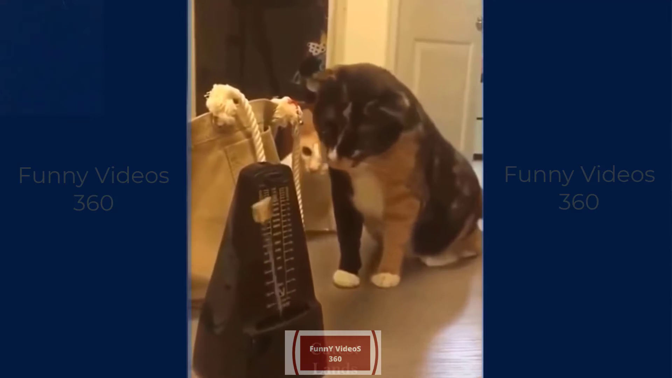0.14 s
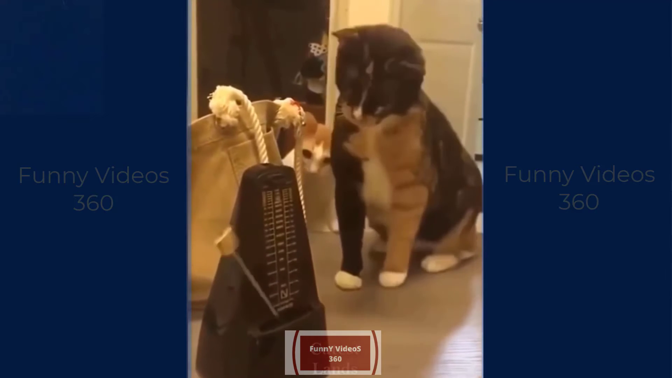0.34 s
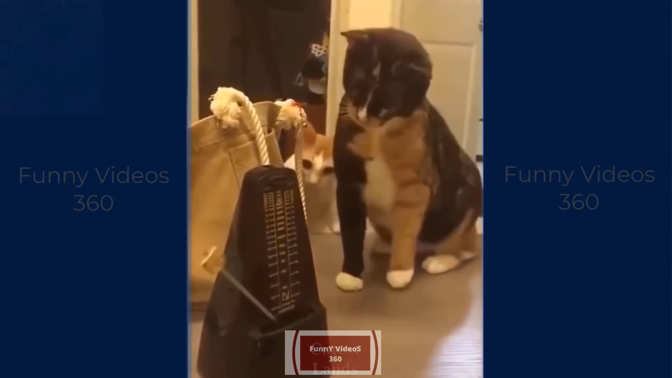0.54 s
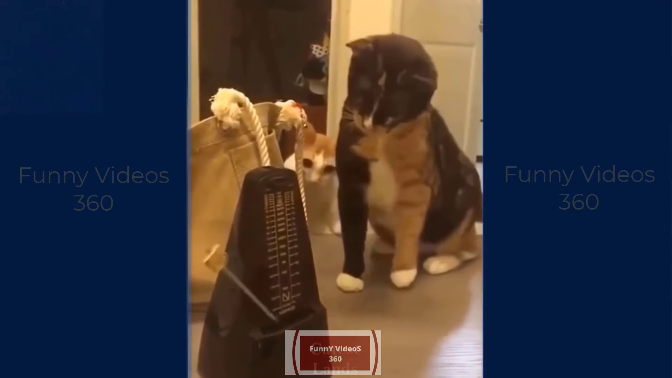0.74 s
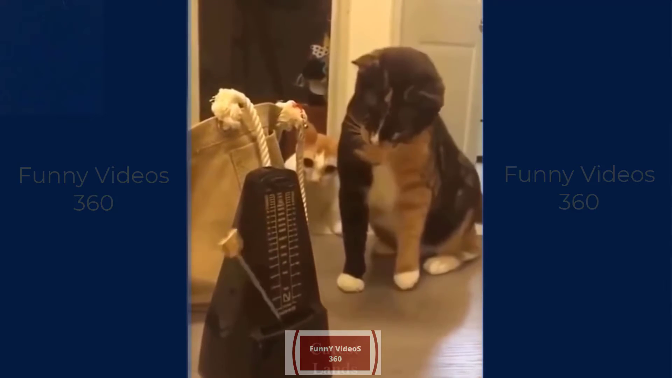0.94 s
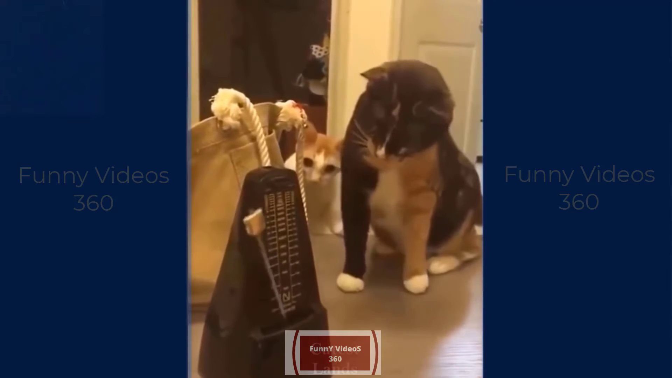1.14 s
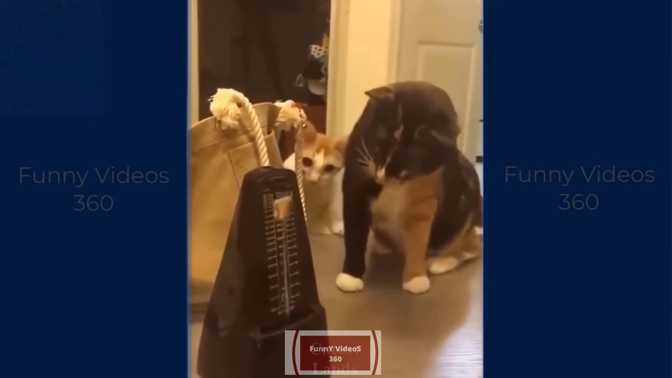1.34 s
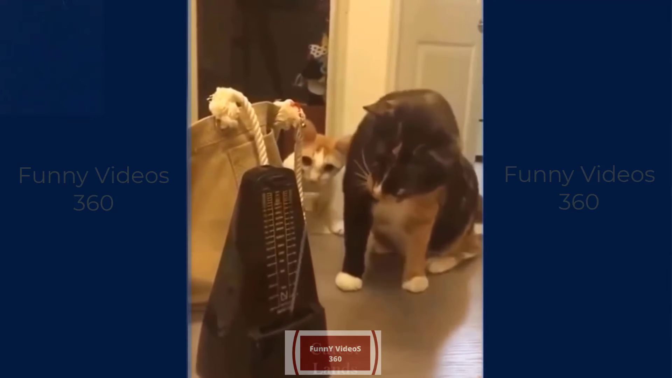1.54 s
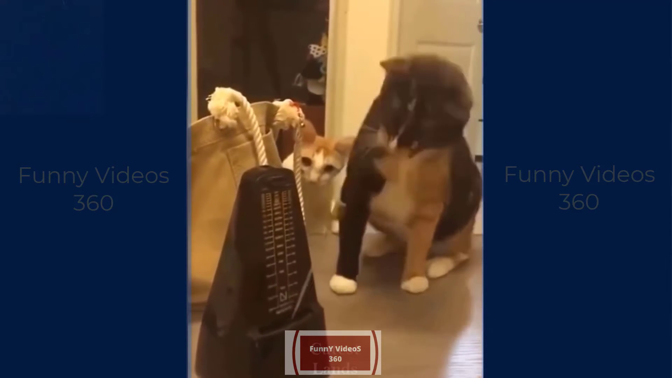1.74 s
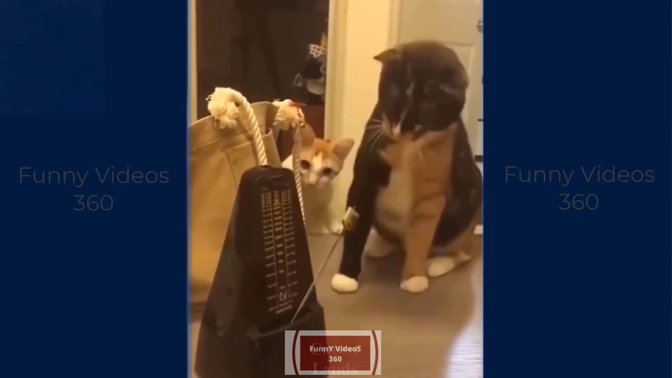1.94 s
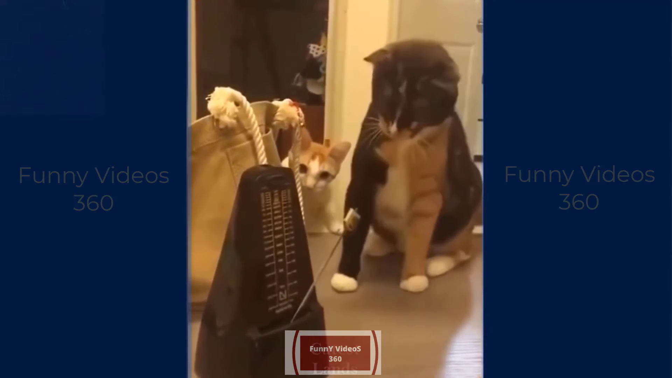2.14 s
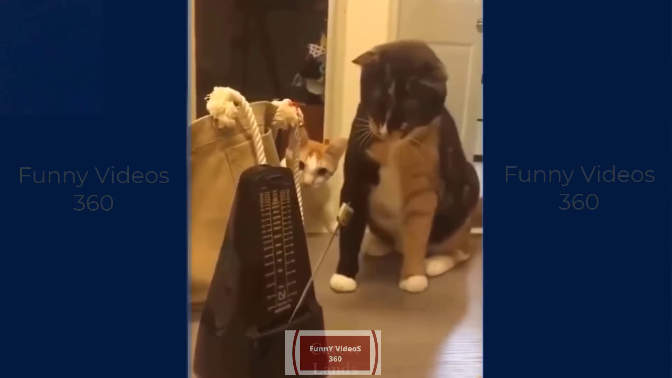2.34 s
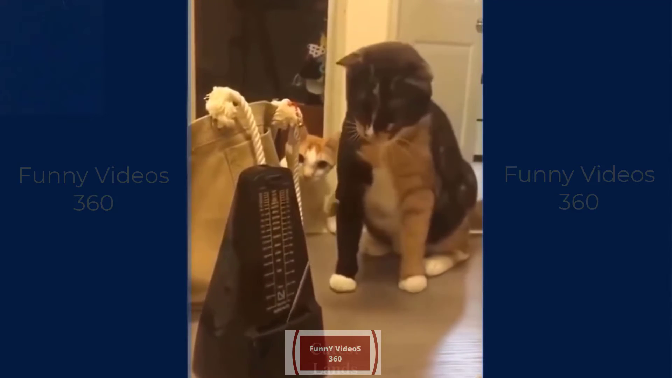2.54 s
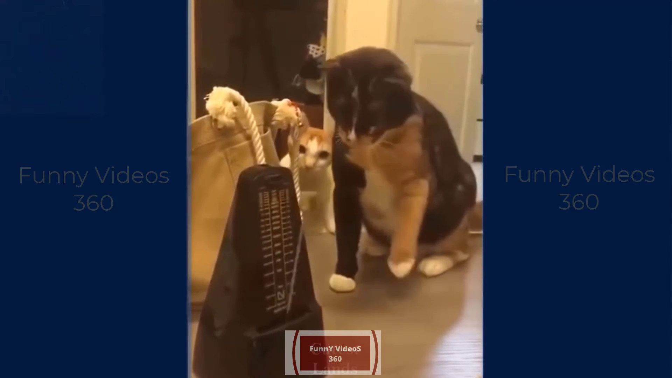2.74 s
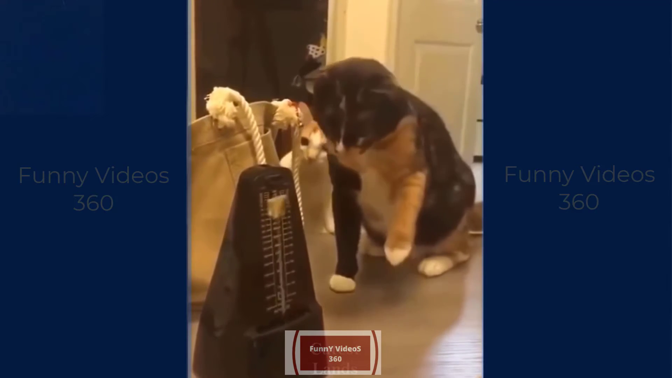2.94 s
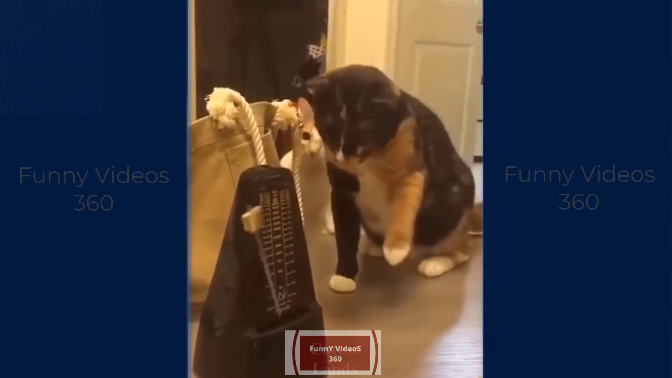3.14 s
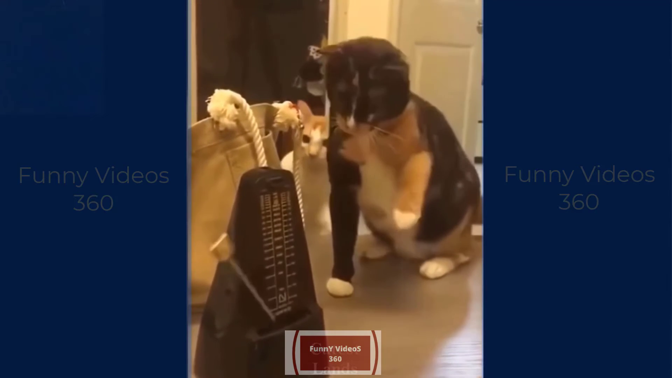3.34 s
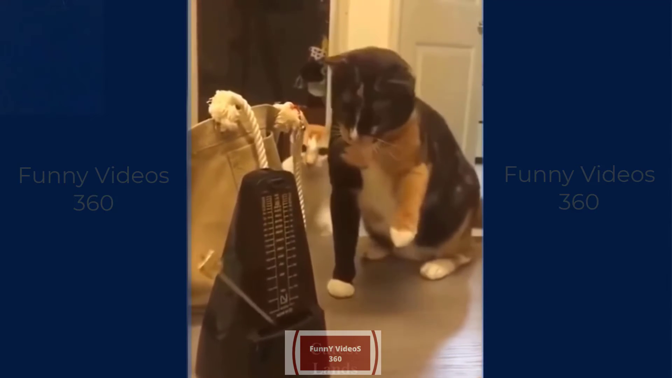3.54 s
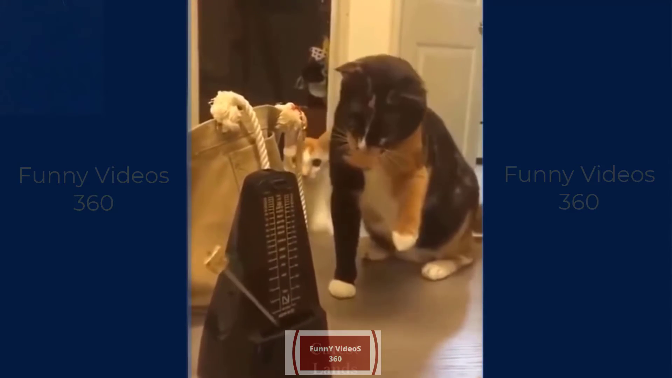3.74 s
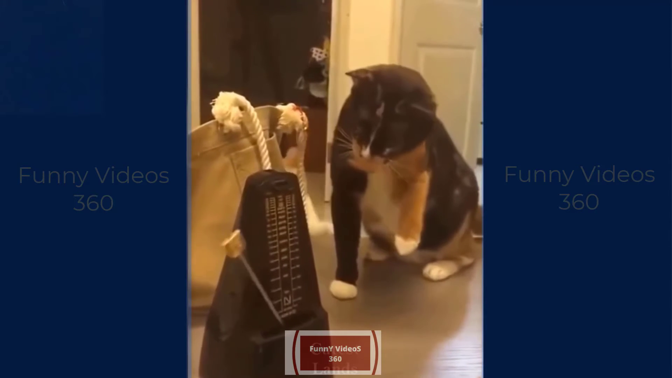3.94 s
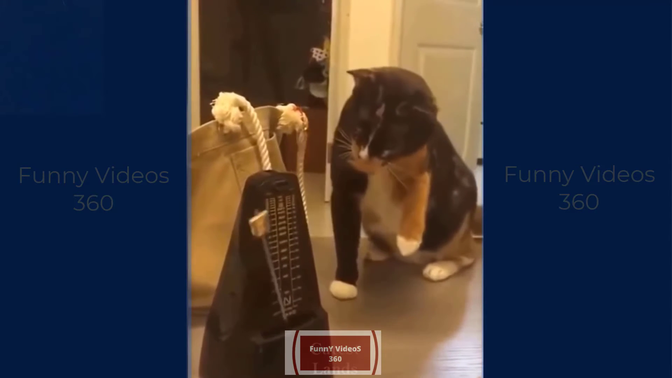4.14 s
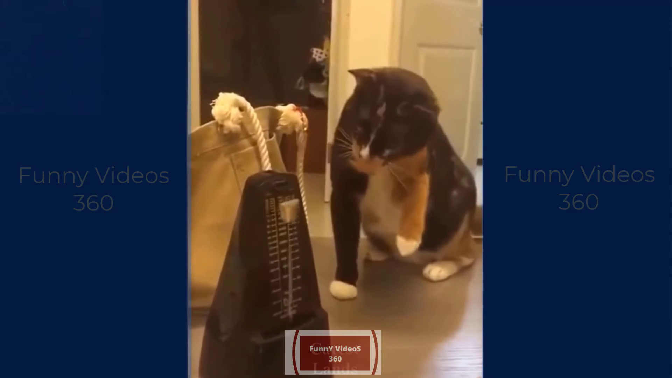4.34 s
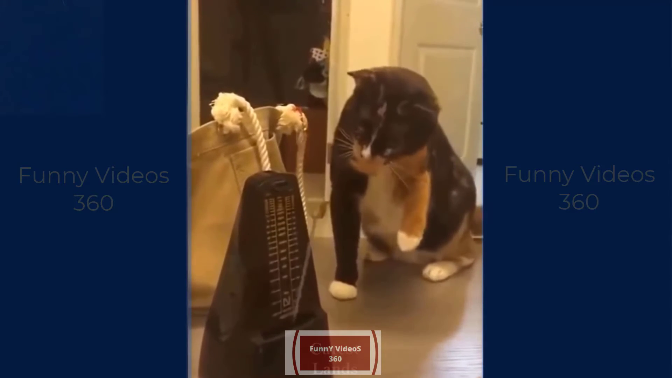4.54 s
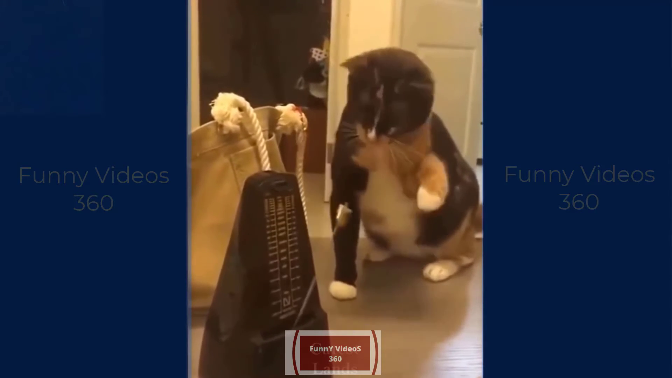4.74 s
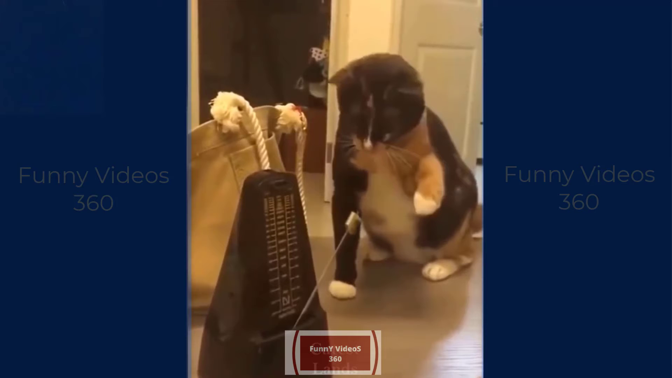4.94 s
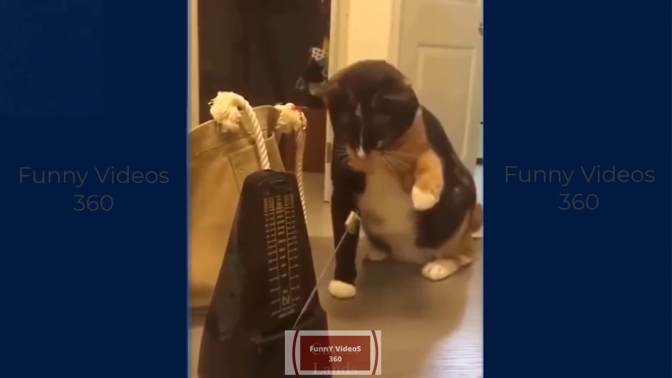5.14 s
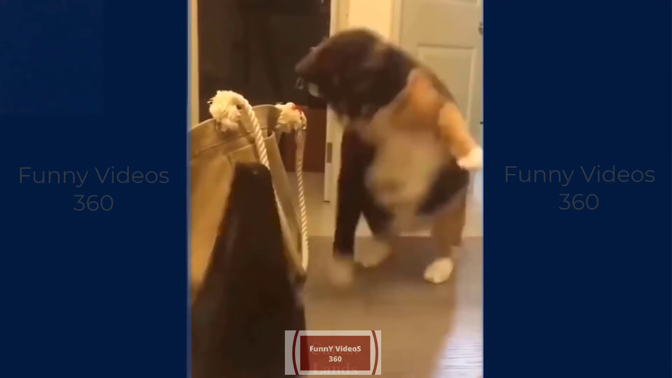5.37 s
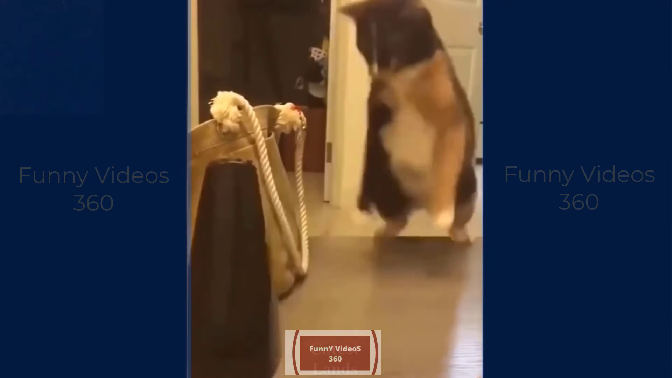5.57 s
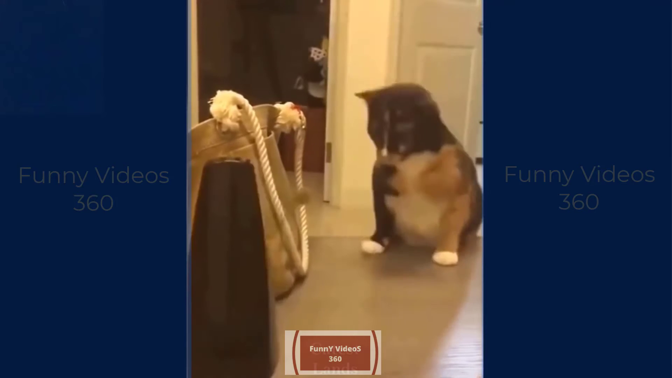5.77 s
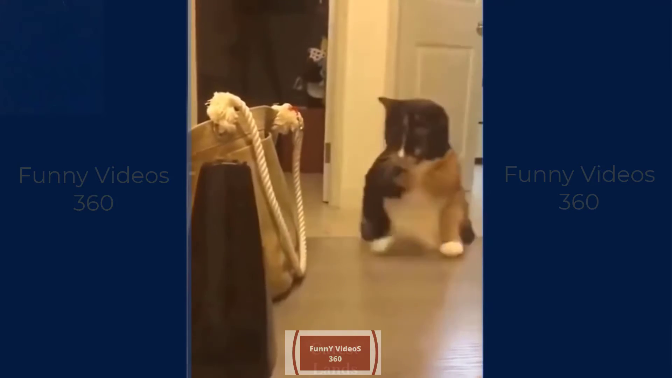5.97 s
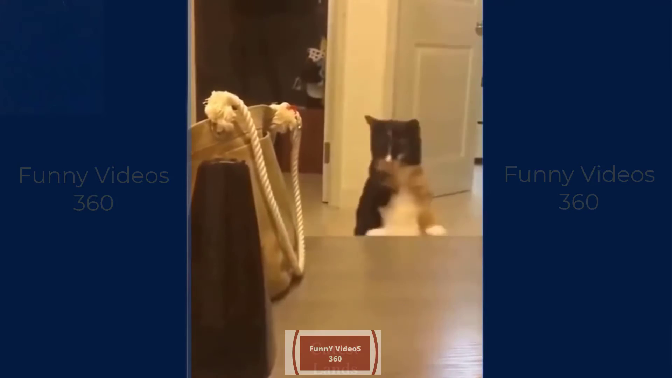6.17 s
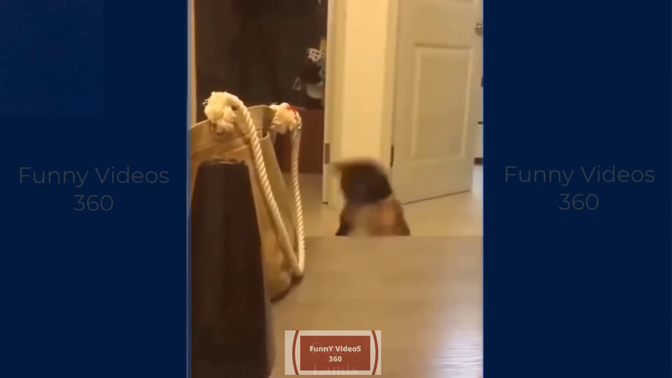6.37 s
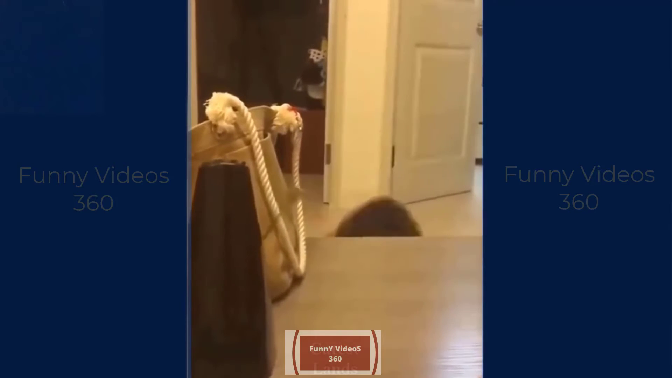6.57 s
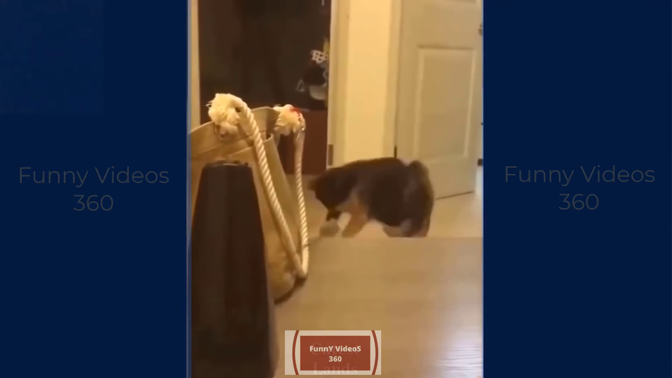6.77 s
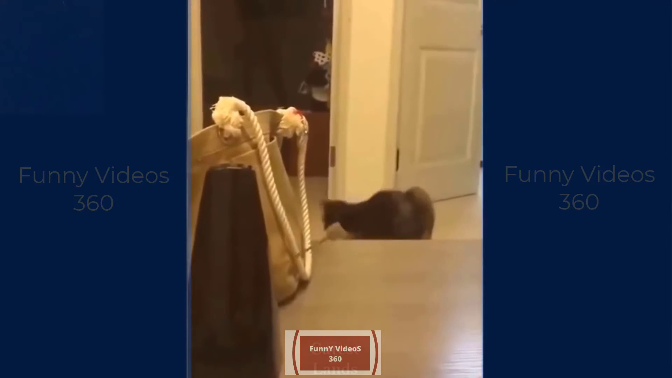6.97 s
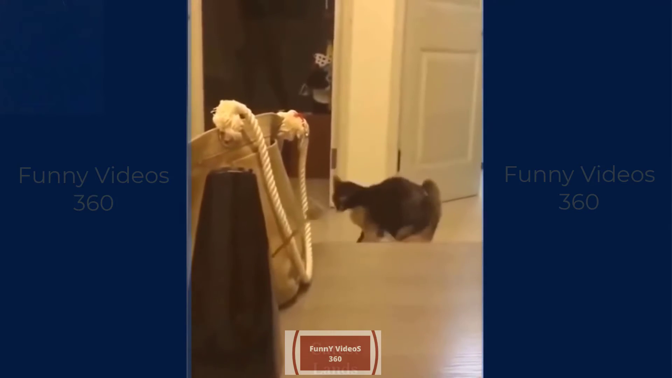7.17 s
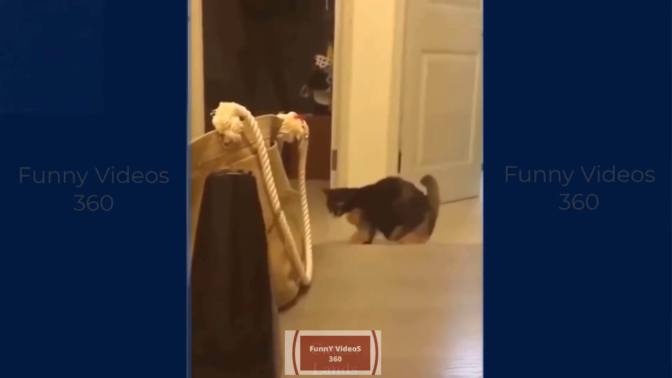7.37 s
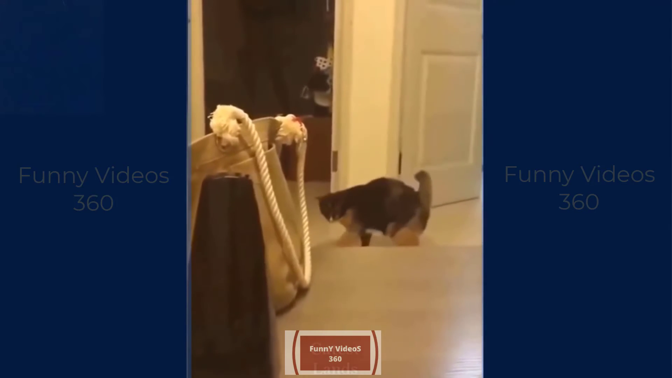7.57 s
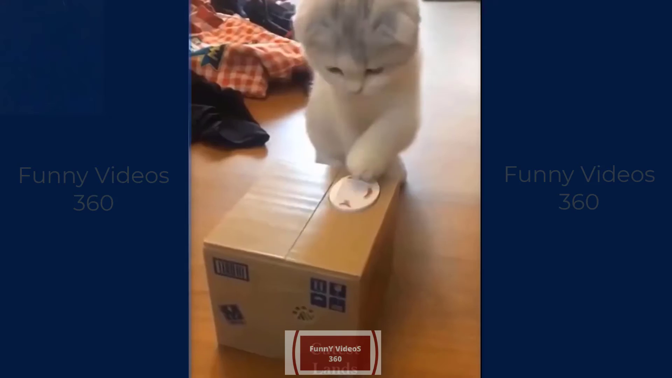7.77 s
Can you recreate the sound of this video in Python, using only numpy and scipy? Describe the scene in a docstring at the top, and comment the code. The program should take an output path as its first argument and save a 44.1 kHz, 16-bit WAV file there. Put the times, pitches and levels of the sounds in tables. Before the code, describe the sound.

Sparse, woody metronome clicks in a small room, interrupted by a burst of claw clacks, hollow knocks and sliding, then ticking resumes, duller.

```python
"""A wind-up metronome ticks slowly on a table in a small room, over the hum of the house.
A cat swats it: claws rake the case, it rocks round on the table top with hollow thumps, paws scuffle away,
and it ticks on with its back to the microphone. Clicks ring the modes of case, rod and table top;
shaped noise makes the sliding and the hum; early echoes and a diffuse tail make the room."""
import sys
import numpy as np
from scipy import signal
from scipy.fft import rfft, irfft
from scipy.io import wavfile

SR = 44100
rng = np.random.default_rng(int(sys.argv[2]) if len(sys.argv) > 2 else 0)


def put_to_file(sound):
    """Save the sound as 16-bit audio at rate SR, in the file named by the first command-line argument."""
    columns = np.atleast_2d(sound).T  # one column per channel
    safe = np.clip(columns, -1, 1)
    whole_steps = np.round(safe * 32767)
    wavfile.write(sys.argv[1], SR, whole_steps.astype(np.int16))


def attenuation_scalar(level_db):
    """Turn a level in dB into a linear amplitude multiplier (20 dB per decade)."""
    decades = np.asarray(level_db, float) / 20
    return 10 ** decades


N = 344416   # length in samples


def in_hz(points, hz):
    """Read a table on a log-frequency axis."""
    p = np.array(points)
    return np.interp(np.log(hz), np.log(p[:, 0]), p[:, 1])


def rms_one(x):
    """Scale to rms 1."""
    return x / np.sqrt(np.mean(x ** 2) + 1e-20)


def coloured(white, spectrum):
    """Give noise a spectrum; rms 1."""
    hz = np.fft.rfftfreq(N, 1 / SR) + 1
    shaped = rfft(white) * attenuation_scalar(in_hz(spectrum, hz))
    return rms_one(irfft(shaped, N))


def drift(rate_hz):
    """Slow chance: straight lines between random knots of spread 1, rate_hz knots a second (40 at most)."""
    knots = rng.standard_normal(int(N / SR * 40) + 2)
    return np.interp(np.arange(N) / SR * rate_hz, np.arange(len(knots)), knots)


def ring(force, hz, t60_s):
    """A damped resonator: a unit click sets a sine of height 1 ringing."""
    radius = attenuation_scalar(-60 / (t60_s * SR))
    turn = 2 * np.pi * hz / SR   # radians per sample
    return signal.lfilter([0, np.sin(turn)], [1, -2 * radius * np.cos(turn), radius ** 2], force + 1e-18)


def hum():
    """Low house noise with narrow booms where the room resonates, and a faint air hiss; noise and hiss waver."""
    # spectrum of the house noise: hz, density_db (per Hz, relative)
    hum_colour = [(12, -66.5), (20, -51), (75, -6), (109, -7.5), (139, -1.5), (160, -19), (194, 6),
                  (215, -5), (339, -8), (383, -18.5), (524, -13.5), (1300, -34), (1690, -70.5),
                  (2860, -120)]
    # spectrum of the air hiss: hz, density_db (per Hz, relative)
    air_colour = [(760, -32), (1300, -5.5), (2000, -0.5), (3140, -8), (3660, -12), (4110, -10.5),
                  (4910, -18), (5660, -17), (8920, -22), (9700, -19), (12600, -56.5), (21300, -120)]
    # room resonances that the hum excites: hz, width_hz, level_db (rms)
    booms = [(76.3, 16.3, -35.5), (189.9, 8, -38), (252.9, 11, -42), (302, 86, -43.5)]
    hum_db, air_db = -32, -54
    out = attenuation_scalar(hum_db + 2.4 * drift(3.155)) * coloured(rng.standard_normal(N), hum_colour)
    waver_db = 0.72 * drift(2.556) + 0.95 * drift(14)
    out += attenuation_scalar(air_db + waver_db) * coloured(rng.standard_normal(N), air_colour)
    for hz, width_hz, level_db in booms:
        boom = ring(rng.standard_normal(N), hz, 3.46 / width_hz)
        out += attenuation_scalar(level_db) * rms_one(boom)
    return out


def blows():
    """Ticks and knocks on the case as rows: start_s, level_db, treble_db, scrape_db, body_db, turned (0-1)."""
    # the escapement ticks: start_s, level_db (relative), treble_db (on the high modes)
    tick_rows = [(0.5036, 1, 0.5), (2.004, 0, 4), (3.4182, 1, 2.5), (4.899, 1, 1.5), (6.331, 2.5, -6.5),
                 (6.799, 2, 5)]
    # claws and table edge knock the case: start_s, level_db (relative), treble_db (on the high modes),
    # turned (share of the back that faces the microphone, 0-1)
    knock_rows = [(0.7587, -35, 7.5, 0.9), (5.568, -3, -2, 0.9), (5.5757, -1.5, 8, 0.4),
                  (5.604, -12, 10, 0.4), (5.6338, -1.5, 3, 0.5), (5.687, -6, 3.5, 0.4),
                  (5.7232, -11, 1, 0.8), (5.754, -14, 6.5, 0.9), (5.7885, -14.5, 1, 0.9),
                  (5.8641, -5, 3.5, 0.9), (5.8755, -6.5, -6, 1), (5.9627, -13, -0.5, 0.4),
                  (5.9968, -11, -12.5, 0.5), (6.0066, -4.5, 2.5, 0.7), (7.1858, -25, -4, 0.8)]
    swatted_s, turned_before, turned_after = 5.57, 0.26, 0.98
    tick_scrape_db, tick_body_db = -26.5, -4.5
    knock_scrape_db, knock_body_db = -25, -5.5
    rows = []
    for start_s, level_db, treble_db in tick_rows:
        turned = turned_after if start_s > swatted_s else turned_before
        rows.append((start_s, level_db, treble_db, tick_scrape_db, tick_body_db, turned))
    for start_s, level_db, treble_db, turned in knock_rows:
        rows.append((start_s, level_db, treble_db, knock_scrape_db, knock_body_db, turned))
    return rows


def case(level_db=-10, spread_db=2.2, crack_db=8, scrape_ms=2.07, soft_hz=4000, lag_cycles=1.2):
    """Each blow, a rounded click with a short scrape behind it, drives all modes. Returns modes and bare cracks."""
    # modes of the case: hz, front_db (heard from the front), back_db (from behind), t60_s
    case_modes = [(324.4, -14, -17, 0.099), (536, -17, -7.5, 0.02), (657, 2, -28.5, 0.04),
                  (813, -9, -1, 0.029), (916, -16.5, -7.5, 0.0092), (1046, -6, -4, 0.019),
                  (1276, -16.5, -16, 0.012), (1793, -15, -10, 0.021), (2027, -6, -13.5, 0.028),
                  (2260, -8.5, -5, 0.0062), (2528, -0.5, -20, 0.023), (2712, 0.5, -5.5, 0.011),
                  (2748, 3.5, -6, 0.014), (3244, -7.5, -9, 0.021), (3470, -3, -32.5, 0.022),
                  (3740, -12.5, -10, 0.0056), (3784, -19.5, -10, .012), (4014, -15.5, -12.5, 0.026),
                  (4630, -2.5, -15, 0.0065), (4720, -5, -13, 0.016), (5116, -6.5, -9.5, 0.0016),
                  (5300, -5.5, -3, 0.0025), (5814, -9.5, -7.5, 0.005), (6130, -13, -3, 0.0034),
                  (6850, -5, -4.5, 0.002), (7580, -13.5, -5.5, 0.0053), (8080, -3.5, -11, 0.0062),
                  (9140, -5.5, -27, 0.0013)]
    body_hz, treble_hz = 1500, 4950   # body modes lie below, treble modes above
    rows = blows()
    age = np.arange(SR // 4) / SR
    modes, cracks = np.zeros((2, N + SR))
    chance = rng.standard_normal((len(rows), len(case_modes)))
    grit = rng.standard_normal((len(rows), len(age)))
    click = signal.lfilter(*signal.butter(2, soft_hz, fs=SR), age == 0) * SR / (4 * soft_hz)
    fade = 1000 * age / scrape_ms
    grit = np.diff(grit, prepend=0) * fade * np.exp(1 - fade)   # differencing makes the scrape bright
    crack_band = signal.butter(1, [900, 6500], "band", fs=SR)   # the contact itself, heard between the modes
    for (start_s, blow_db, treble_db, scrape_db, body_db, turned), luck, rough in zip(rows, chance, grit):
        force = attenuation_scalar(blow_db + level_db) * (click + attenuation_scalar(scrape_db) * rough)
        turned = np.clip(turned, 0, 1)
        cracks[round(start_s * SR):][:len(age)] += attenuation_scalar(crack_db) * signal.lfilter(*crack_band, force)
        for k, (hz, front_db, back_db, t60_s) in enumerate(case_modes):
            heard_db = front_db + turned * (back_db - front_db) + spread_db * luck[k]
            heard_db += treble_db * (hz > treble_hz) + body_db * (hz < body_hz)
            at = round((start_s + lag_cycles / hz) * SR)   # low modes take longer to speak
            modes[at:at + len(age)] += (-1) ** k * attenuation_scalar(heard_db) * ring(force, hz, t60_s)
    no_bass = signal.butter(2, 250, "high", fs=SR, output="sos")   # a small box sends out no bass
    return signal.sosfilt(no_bass, np.stack([modes, cracks])[:, :N])


def rod(level_db=-9, spread_db=1.5):
    """Claws catch the thin metal pendulum rod, which rings a little longer than the case."""
    # claws catch the rod: start_s, level_db (relative)
    swats = [(5.5722, 0), (5.5751, 1.5), (5.5834, 0), (5.6024, -16), (5.8745, -15.5)]
    # modes of the rod: hz, level_db (relative), t60_s
    rod_modes = [(2150, -8, .06), (3320, -1, .11), (3440, -6, .09), (4070, -8, .05), (4740, -11, .06)]
    start_s, swat_db = np.transpose(swats)
    out = np.zeros(N)
    chance = rng.standard_normal((len(swats), len(rod_modes)))
    for (hz, mode_db, t60_s), luck in zip(rod_modes, chance.T):
        force = np.zeros(N)
        force[np.round(start_s * SR).astype(int)] = attenuation_scalar(swat_db + level_db + mode_db + spread_db * luck)
        out += ring(force, hz, t60_s)
    return out


def scuffle(per_s=1800, grain_db=2.5, judder_db=2.0):
    """Sliding contact: dense uneven grains under a juddering slide and short strokes of the paws."""
    # the base slides over the table top: time_s, level_db (before judder)
    slide = [(5.575, -65.5), (5.588, -14.5), (5.628, -24), (5.65, -13.5), (5.705, -14.5), (5.79, -22.5),
             (5.86, -29.5), (5.93, -32.5), (5.99, -20), (6.07, -32.5), (6.17, -36.5), (6.2, -60)]
    # paws scuff away: start_s, level_db (relative)
    scuffs = [(6.197, -24.5), (6.232, -24.5), (6.282, -26)]
    # colour of sliding contact: hz, density_db (per Hz, relative)
    scuffle_colour = [(88, -30), (150, -13.5), (323, 4), (405, -7), (844, -10.5), (1120, -24), (1280, -15),
                      (1500, -27), (2020, -13.5), (7870, -43), (9700, -56.5), (12600, -76), (21300, -120)]
    t = np.arange(N) / SR
    slide_db = np.interp(t, *np.transpose(slide), left=-200, right=-200)
    stroke = attenuation_scalar(slide_db + judder_db * drift(30))
    for start_s, level_db in scuffs:
        fade = np.maximum(t - start_s, 0) / 0.032   # decay time in s
        stroke = stroke + attenuation_scalar(level_db) * (1 - np.exp(-8 * fade)) * np.exp(-fade)
    struck = rng.random(N) < per_s / SR
    height = attenuation_scalar(grain_db * np.minimum(rng.exponential(1, N), 4))
    grains = struck * height * rng.choice([-1, 1], N)
    return stroke * coloured(grains, scuffle_colour)


def table(level_db=-6, spread_db=3.0, octave_db=-9, soft_hz=900):
    """Soft drops of the base ring the low modes of the table top, most those near the pitch of the spot."""
    # the base drops on the table top: start_s, level_db (relative), spot_hz (pitch that the spot favours)
    thumps = [(5.635, 1.5, 444), (5.66, -5.5, 227), (5.687, 2.5, 247), (5.718, -2.5, 287), (5.753, -5, 340),
              (5.779, -6, 350), (5.79, -8, 370), (6.003, -1, 373), (6.026, -3, 440)]
    # modes of the table top: hz, level_db (relative), t60_s
    table_modes = [(198.5, -0.5, 0.11), (251.7, 1.5, 0.11), (283, -4.5, 0.083), (336.5, -2, 0.13),
                   (367.4, 1.5, 0.11), (430, -3, 0.12), (464, -2.5, 0.11), (497, 1, 0.027),
                   (546, -1, 0.063)]
    rebound_s, rebound_scatter, rebound_loss_db = 0.016, 0.13, 7.5
    out = np.zeros(N + SR)
    gaps_s = rebound_s * (1 + rebound_scatter * rng.standard_normal(len(thumps)))
    touches = []
    for (start_s, drop_db, spot_hz), gap_s in zip(thumps, gaps_s):
        for k in range(3):   # each drop chatters on twice
            touches.append((start_s + k * gap_s, drop_db - k * rebound_loss_db, spot_hz))
    chance = rng.standard_normal((len(touches), len(table_modes)))
    push = signal.lfilter(*signal.butter(2, soft_hz, fs=SR), np.arange(SR // 2) == 0)
    for (start_s, touch_db, spot_hz), luck in zip(touches, chance):
        at = round(start_s * SR)
        for k, (hz, mode_db, t60_s) in enumerate(table_modes):
            heard_db = mode_db + octave_db * abs(np.log2(hz / spot_hz)) + spread_db * luck[k]
            height = (-1) ** k * attenuation_scalar(touch_db + level_db + heard_db)
            out[at:at + SR // 2] += height * ring(push, hz, t60_s)
    no_bass = signal.butter(4, 140, "high", fs=SR, output="sos")   # the top cancels its own bass
    return signal.sosfilt(no_bass, out[:N])


def first_echoes(direct):
    """The nearest surfaces return late, dulled copies of the direct sound."""
    # nearest surfaces: late_s, level_db
    surfaces = [(.005, -16), (0.0156, -12)]
    echoes = sum(attenuation_scalar(level_db) * np.roll(direct, round(late_s * SR)) for late_s, level_db in surfaces)
    return signal.lfilter(*signal.butter(1, 6000, fs=SR), echoes)


def room(x, near_db=9, near_t60_s=0.099, build_s=0.0095):
    """A diffuse tail that dies band by band; table and nearby things add a dense, quickly dying start."""
    # decay of the small room: hz, t60_s
    room_decay = [(300, 0.12), (1000, 0.49), (3000, 0.37), (8000, 0.4)]
    age, tail = np.arange(SR // 2) / SR, 0
    edges = 100 * 2 ** np.arange(7.5)   # octave bands
    for low, high in zip(edges, edges[1:]):
        octave = signal.butter(2, [low, high], "band", fs=SR, output="sos")
        band = signal.sosfilt(octave, rng.standard_normal(len(age)))
        tail = tail + band * attenuation_scalar(-60 * age / in_hz(room_decay, np.sqrt(low * high)))
    near = attenuation_scalar(near_db - 60 * age / near_t60_s)
    tail = tail * (1 - np.exp(-age / build_s)) * (1 + near)
    return signal.fftconvolve(x, tail / np.sqrt(np.sum(tail ** 2)))[:N]


def scene():
    """Direct blows, their dull first echoes, the table top and sliding, the room tail and the hum, in mono."""
    room_db, table_room_db, crack_room_db = -5, -7.5, 2.5
    house = hum()
    modes, cracks = case()
    direct = modes + cracks + rod()
    low = scuffle() + table()
    tail = room(attenuation_scalar(room_db) * direct + attenuation_scalar(table_room_db) * low)
    # the bare contact noise spreads to all sides and fills the tail between the modes
    tail += room(attenuation_scalar(crack_room_db) * cracks)
    return (direct + first_echoes(direct) + low + tail + house)[None]


def top_cut(x):
    """Nothing passes above the cut-off."""
    return signal.sosfilt(signal.butter(12, 9850, fs=SR, output="sos"), x)


def record(dry):
    """The top is cut off, down 60 dB from 10950 Hz, then peaks beyond full scale are clipped."""
    cut = signal.sosfilt(signal.cheby2(10, 60, 10950, fs=SR, output="sos"), dry)
    return top_cut(np.clip(cut, -1, 1))


dry = scene()
out = record(dry)
put_to_file(out)
```